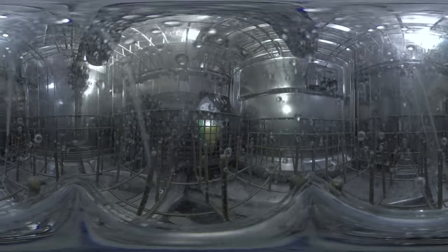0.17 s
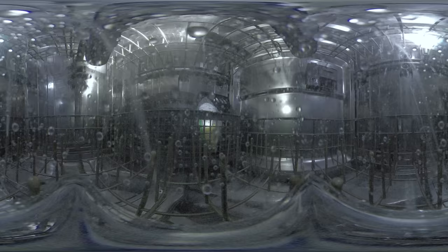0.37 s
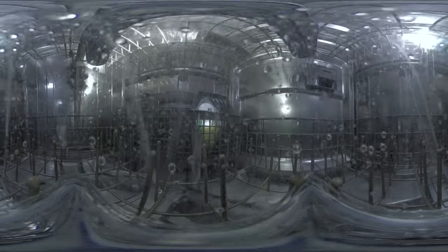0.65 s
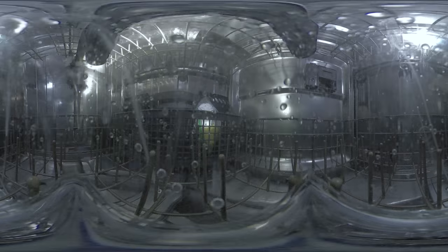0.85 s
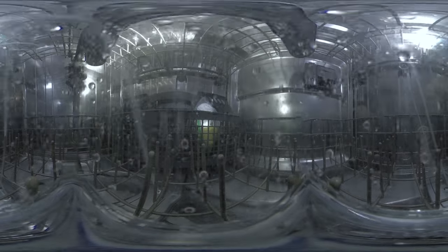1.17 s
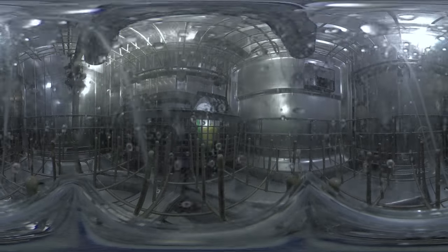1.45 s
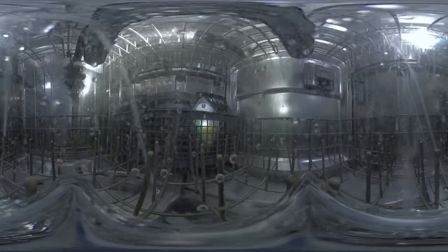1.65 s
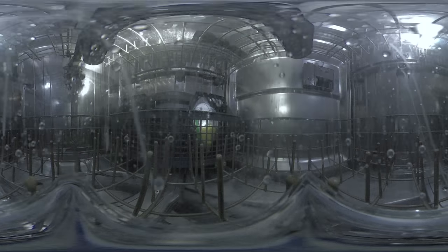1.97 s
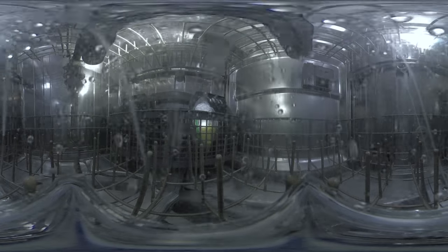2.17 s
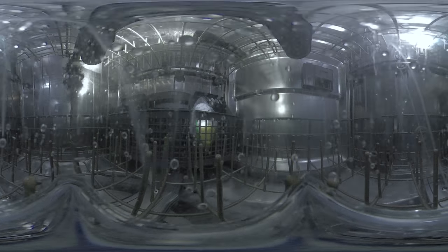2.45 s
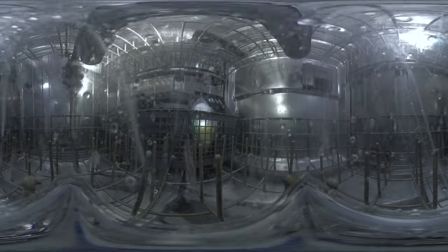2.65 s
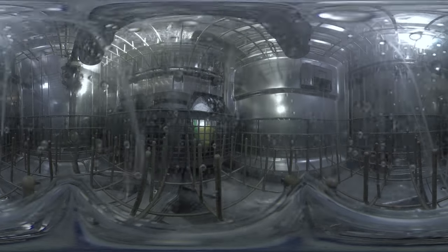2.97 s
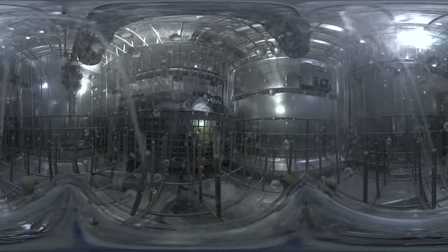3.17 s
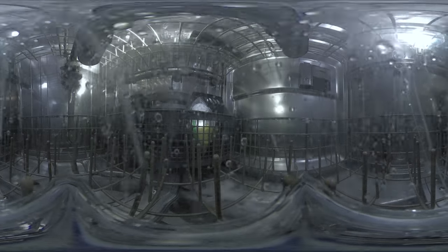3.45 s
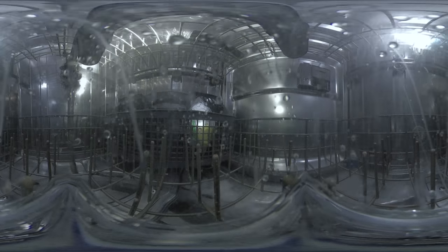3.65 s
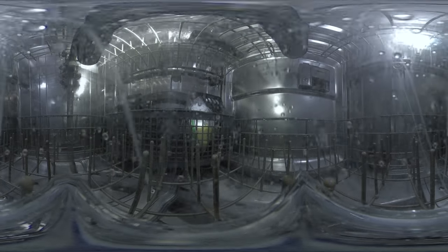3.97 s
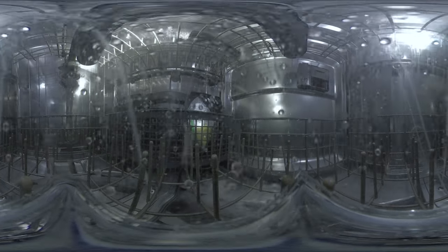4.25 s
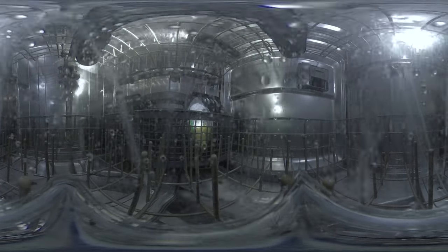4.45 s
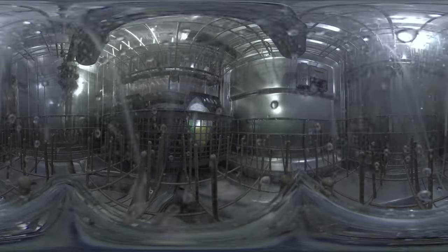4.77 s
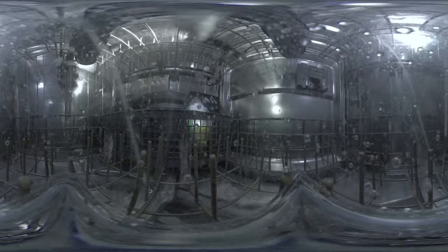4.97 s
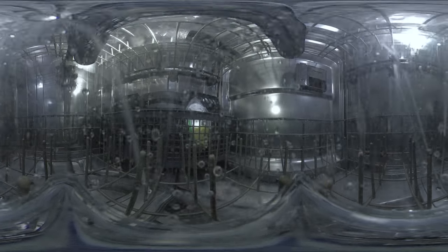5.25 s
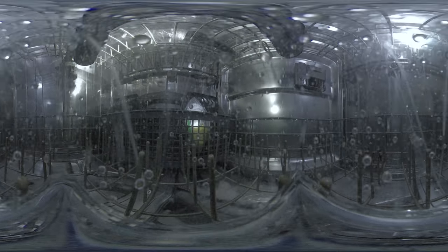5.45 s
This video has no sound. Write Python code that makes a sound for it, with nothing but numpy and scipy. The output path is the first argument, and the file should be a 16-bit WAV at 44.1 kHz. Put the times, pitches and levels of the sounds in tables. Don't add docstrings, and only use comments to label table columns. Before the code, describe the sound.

A dense, resonant water roar fills a small steel tub from start to end, pulsing several times a second as the turning jets cross walls, racks and case. Bright millisecond ticks scatter over it, clustered between 1.1 and 1.8 seconds, sparser afterwards. The loudest clacks, around 3 and 5.3 seconds, ring briefly and overload the input. The cased stereo microphone sits in the spray; a pump hums faintly.

```python
import sys
import numpy as np
from scipy import signal
from scipy.fft import rfft, irfft
from scipy.io import wavfile

SR = 44100
rng = np.random.default_rng(int(sys.argv[2]) if len(sys.argv) > 2 else 0)


def materialize(psi):
    bounded = np.clip(np.atleast_2d(psi).T, -1, 1)
    quanta = np.round(bounded * 32767).astype(np.int16)
    wavfile.write(sys.argv[1], SR, quanta)


def nominal_scale(level):
    x = np.asarray(level, float) / 20
    return 10 ** x


N = 247401

# frequency in Hz, width in Hz, left level in dB rms,
# right level in dB rms, phase of right against left in radians.
TUB_MODES = [(199, 47, -59, -52, -2), (236, 29, -52.5, -45.5, -2.5), (275, 40, -54, -45.5, -2.5),
             (413, 86, -59.5, -51.5, -1.5), (491, 79, -48.5, -40.5, -2.5), (586.5, 87, -34, -29, -3.0),
             (704, 77, -33, -28.5, -3), (822, 79, -31, -25.5, 3), (895.6, 38, -34, -27.5, 3),
             (976, 140, -35.5, -29, 2.32), (1046.4, 46, -41.5, -26.5, 1.9), (1119, 45.4, -35.5, -24.5, 1.5),
             (1189, 54, -50, -33.5, 1.87), (1252, 54, -39.5, -40, 1.5), (1282.7, 21, -54, -33, 0.83),
             (1325, 10.5, -62, -39, 1.76), (1420, 52, -56, -40, 0.34), (1534, 33, -52, -41, -3),
             (1675, 28, -57, -42, -1.5), (1807, 145, -43, -46, 1), (1936, 74, -35, -39.5, 2.5),
             (2234, 17, -44.5, -73, 8.3)]
# frequency in Hz, width in Hz, left level in dB rms,
# right level in dB rms, phase of right against left in radians.
CASE_MODES = [(2360, 24, -49.7, -54.5, 0.5), (2470, 84, -44.4, -39.6, -1.1), (2620, 34, -48.5, -42.7, -0.3),
              (2719, 38, -43.2, -34.4, -0.1), (2860, 359, -43.3, -37.0, -0.4),
              (3150, 146, -51.2, -42.7, -0.8), (3640, 83, -50.1, -43.1, -0.4),
              (3920, 302, -36.6, -40.5, -2.8), (4030, 100, -45.7, -37.2, -2.9),
              (4390, 170, -42.5, -35, 0.8), (4490, 24, -58, -47.4, 0.3), (4610, 239, -41, -42, 0.2),
              (4770, 41, -42.7, -41.4, -0.2), (4910, 219, -32.4, -32.7, -0.2),
              (5180, 402, -58, -38.0, -0.1), (6220, 982, -42.4, -42.3, 1.7),
              (7130, 640, -41.6, -34.8, -1.3), (9300, 233, -45.1, -58, -0.5),
              (11530, 894, -39.4, -42.0, -1.8), (12990, 1134, -43.8, -41.7, 1.2),
              (13830, 559, -37.6, -58, -2.9), (15560, 706, -38.0, -42.6, 0.0)]
# time in seconds, swell in dB.
WALL_PASSES = [(0.07, 3), (0.32, 2.5), (0.52, 3.5), (0.87, 3), (1.1, 3.5), (1.23, 1.4), (1.49, 1.5),
               (1.75, 2), (2.0, 5), (2.26, 1.8), (2.71, 2.7), (3.18, 2.8), (3.35, 3), (3.75, 1.8),
               (4.06, 2.5), (4.43, 4.1), (4.62, 4.5), (4.73, 1.7), (5.12, 2.5), (5.53, 4.5)]
# time in seconds, swell in dB.
RACK_PASSES = [(0.025, 10), (0.838, 9.3), (1.422, 15.5), (1.576, 6.1), (1.736, 8), (1.971, 3), (2.464, 8),
               (3.078, 11), (3.153, 13), (3.218, 6.7), (3.347, 7), (3.956, 1), (4.056, 7), (4.51, 10),
               (4.58, 5), (4.634, 12), (4.964, 11.5), (5.059, 4.4), (5.133, 4.9), (5.213, 11.5),
               (5.308, 11), (5.363, 7.2), (5.468, 7.6), (5.557, 6.0)]
# time in seconds, swell in dB.
CASE_PASSES = [(0.13, 2), (0.31, 3), (0.74, 2.2), (0.9, 1), (1.15, 1.5), (1.27, 0), (1.62, 1), (1.76, 1.5),
               (2.01, 2.5), (2.43, 1.2), (2.56, 1.5), (3.23, 0.5), (3.47, 3), (3.8, 1.5), (3.95, 2.4),
               (4.52, 1.5), (4.69, 1.5), (4.9, 0.5), (5.24, 3.4), (5.49, 1)]
# time in seconds, splash level in dB, colour in Hz,
# spread in octaves, ring level in dB.
KNOCKS = [(0.0046, -20, 4630, 0.65, -22), (0.2953, -29, 9000, .53, -23), (0.7505, -18.5, 5500, 0.72, -14),
          (0.9007, -13, 7100, 0.22, -18), (1.1898, -13.5, 14500, .42, -21), (1.2566, -19, 5670, .15, -26),
          (1.3671, -31, 9500, .46, -29), (1.5961, -18, 5000, 1.4, -16), (1.7585, -27, 8600, .45, -28),
          (2.9935, -12.5, 5900, 0.2, -5.5), (3.2342, -21, 2900, .4, -18.5), (3.4849, -30, 7700, .7, -28),
          (3.7969, -11, 15500, 0.27, -28), (4.4754, -27, 9100, .44, -24), (4.5541, -29, 7900, .68, -28),
          (4.7106, -8.5, 7150, 0.21, -13.5), (5.1611, -22, 7400, .44, -24), (5.2502, -27, 8700, .7, -23),
          (5.2588, -20, 8600, 0.39, -30), (5.2632, -18, 6400, .4, -4.5)]
# time in seconds, splash level in dB, colour in Hz,
# spread in octaves.
TICKS = [(0.0921, -17, 14000, 0.44), (0.3588, -20.5, 7700, 0.23), (0.8831, -25, 6000, .7),
         (1.1409, -25, 10500, .7), (1.2025, -23, 6500, .39), (1.2703, -27, 12300, .31),
         (1.335, -27, 7800, .16), (1.4727, -28, 9000, .41), (1.4949, -19, 6900, .11),
         (1.5152, -25, 13800, .24), (1.6171, -20, 8700, .4), (1.7634, -22, 7400, 0.54),
         (1.8778, -22, 10000, .32), (2.3082, -25, 13600, .21), (2.335, -24, 9000, .24),
         (2.5505, -26, 8900, .5), (2.5565, -27, 7800, .67), (2.9312, -28, 5900, .69),
         (3.3375, -14, 1130, 0.079), (3.4364, -35, 5300, .7), (3.4524, -24, 12000, .17),
         (3.7894, -24, 8200, .7), (4.33, -16, 12800, .16), (4.5176, -22, 1700, 0.32),
         (4.5625, -28, 12500, .47), (5.4853, -16, 10700, 0.21), (5.5749, -28, 6900, .7)]
# frequency in Hz, width in Hz, left level in dB, right level in dB,
# phase of right against left in radians.
DROP_RING_MODES = [
    (5000, 260, 0, 0, -.2),
    (5500, 400, -7, -11, .4),
    (2750, 400, -19, -16, 0),
]
# time in seconds, peak level in dB.
THUDS = [
    (2.9935, -47),
    (3.797, -38),
    (4.97, -43),
    (5.2632, -42),
]
# frequency in Hz, left level in dB per Hz,
# right level in dB per Hz.
HISS_COLOUR = [(30, -96, -97), (61.7, -76.5, -75), (103, -78, -87), (191, -70, -72), (332, -74.5, -70.5),
               (735, -67, -55), (1390, -77.5, -63.5), (2360, -69, -66.5), (3280, -75, -66),
               (5430, -73.5, -70), (8900, -72, -73), (10700, -75, -77.5), (13300, -97, -71.5),
               (15300, -76, -84)]
# frequency in Hz, left level in dB rms, right level in dB rms.
PUMP_LINES = [
    (57, -63, -70),
    (119.2, -57.5, -60),
    (233, -58, -52.5),
]

TUB_TO_HZ, CASE_FROM_HZ, MIST_FROM_HZ = 1700, 3400, 5600
RACK_FROM_HZ, RACK_TO_HZ = 2600, 2800
WALL_PASS_S, RACK_PASS_S, CASE_PASS_S = 0.052, 0.018, 0.036
MIST_FOLLOWS = 0.86
TICK_RING_DB = -40
STRAY_DROPS, STRAY_DB, STRAY_HZ, STRAY_OCTAVES = 16, -27.5, 10000, .5
EVEN_HZ, PAN_DB_PER_OCTAVE = 11000, 4.5
CRACK_DB, PORT_HZ, PORT_DB = -8.0, 15300, -12.0
INPUT_TOP_HZ = 15740


def drummed_modes(tub, rack, case, mist, lumps, flicker_db, alike):
    out = np.zeros((2, N))
    white = rng.standard_normal((3, N))
    flickers = [nominal_scale(flicker_db * drift(8.0)) for k in range(8)]
    near_rack = rms_one(rack ** 0.32)
    for k, mode in enumerate([*TUB_MODES, *CASE_MODES]):
        hz = mode[0]
        if hz < TUB_TO_HZ:
            force = tub
        elif RACK_FROM_HZ < hz < RACK_TO_HZ:
            force = rack
        elif hz < CASE_FROM_HZ:
            force = near_rack
        elif hz < MIST_FROM_HZ:
            force = case
        else:
            force = mist
        shifted = np.roll(white, 5003 * k, axis=1)
        drive = shifted[2]
        if hz > MIST_FROM_HZ:
            drive = np.sqrt(alike) * drive + np.sqrt(1 - alike) * shifted[:2]
        if hz > TUB_TO_HZ:
            force = force * lumps
        if hz > 300:
            drive = drive * (force * flickers[k % len(flickers)])
        out += resonate(drive, mode)
    return out


def resonate(drive, mode):
    hz, width_hz, left_db, right_db, phase = mode
    r = np.exp(-2 * np.pi * .78 * width_hz / SR)
    pole = r * np.exp(2j * np.pi * hz / SR)
    scale = np.sqrt(2 * (1 - r * r) ** 3 / (1 + r * r))
    swing = scale * signal.lfilter([1], [1, -2 * pole, pole * pole], drive)
    ports = np.array([[nominal_scale(left_db)], [nominal_scale(right_db) * np.exp(1j * phase)]])
    return (swing * ports).real


def sweep_gains():
    wall_db = swells(WALL_PASSES, WALL_PASS_S)
    rack_db = swells(RACK_PASSES, RACK_PASS_S)
    case_db = swells(CASE_PASSES, CASE_PASS_S)
    return [rms_one(nominal_scale(db)) for db in (wall_db, rack_db, case_db, MIST_FOLLOWS * case_db)]


def swells(passes, width_s):
    s, swell_db = np.transpose(passes)
    coarse = np.arange(0, N + 128, 128) / SR
    bells = np.exp(-.5 * ((coarse[:, None] - s) / width_s) ** 2)
    return np.interp(np.arange(N) / SR, coarse, bells @ swell_db)


def spatter(per_s, spread_db):
    sizes = nominal_scale(spread_db * np.minimum(rng.exponential(1, N), 4))
    splats = sizes * (rng.random(N) < per_s / SR)
    fade = np.exp(-1 / (.006 * SR))
    return rms_one(np.sqrt(1 + .13 * signal.lfilter([1], [1, -fade], splats ** 2)))


def drift(rate):
    r = np.exp(-80 * np.pi * rate / SR)
    slow = signal.lfilter([1], [1, -2 * r, r * r], rng.standard_normal(N // 40 + 1002))[1000:]
    return np.interp(np.arange(N) / 40, np.arange(len(slow)), rms_one(slow))


def rms_one(x):
    return x / np.sqrt(np.mean(x ** 2, axis=-1, keepdims=True) + 1e-20)


def drops():
    size = 512
    ms = np.arange(size) / SR * 1000
    shape = (1 - np.exp(-ms / .3)) * (np.exp(-(ms / 1.6) ** 2) + .15 * np.exp(-ms / 2.5))
    ring = sum(resonate(np.eye(1, size), mode) for mode in DROP_RING_MODES)
    ring = ring / np.sqrt(np.mean(ring[:, :size // 4] ** 2))
    crack_band = signal.butter(2, 3000, "high", fs=SR, output="sos")
    port_band = signal.butter(2, [PORT_HZ - 700, PORT_HZ + 700], "band", fs=SR, output="sos")
    rows = all_drops()
    noise = rng.standard_normal((len(rows), 3, size))
    out = np.zeros((2, N + size))
    for (s, splash_db, hz, octaves, ring_db), (both, *own) in zip(rows, noise):
        burst = shape * (both + .7 * np.array(own))
        edges = np.minimum(hz * 2 ** (np.array([-1.1, 1.1]) * octaves), .45 * SR)
        colour_band = signal.butter(2, edges, "band", fs=SR, output="sos")
        splash = rms_one(signal.sosfilt(colour_band, burst))
        crack = nominal_scale(CRACK_DB) * rms_one(signal.sosfilt(crack_band, burst))
        crack = crack + nominal_scale(PORT_DB) * rms_one(signal.sosfilt(port_band, burst))
        splash = .5 * rms_one(splash + crack * (hz > 3000))
        pan_db = np.array([[.5], [-.5]]) * np.clip(PAN_DB_PER_OCTAVE * np.log2(hz / EVEN_HZ), -4, 2)
        at = round(s * SR)
        out[:, at:at + size] += splash * nominal_scale(splash_db - 1.5 + pan_db) + ring * nominal_scale(ring_db)
    return out[:, :N]


def all_drops():
    when, pitch = rng.random((STRAY_DROPS, 2)).T
    strays = [(s * N / SR, STRAY_DB, STRAY_HZ * 2 ** (p - .5), STRAY_OCTAVES) for s, p in zip(when, pitch)]
    return list(KNOCKS) + [(*row, TICK_RING_DB) for row in list(TICKS) + strays]


def thuds(push_ms):
    ms = np.arange(N) / SR * 1000
    out = np.zeros(N)
    for s, peak_db in THUDS:
        since = np.maximum(ms - s * 1000, 0) / push_ms
        out += nominal_scale(peak_db) * since * np.exp(1 - since)
    return out


def hiss(mist, lumps, bass_alike_hz):
    hz = np.maximum(np.fft.rfftfreq(N, 1 / SR), 5)
    points, left_db, right_db = np.transpose(HISS_COLOUR)
    colour = nominal_scale([np.interp(np.log(hz), np.log(points), side) for side in (left_db, right_db)])
    colour = colour * np.minimum(hz / points[0], 1) ** 2 * np.sqrt(SR / 2)
    upper = 1 / (1 + (2500 / hz) ** 4)
    alike = 0.96 / (1 + (hz / bass_alike_hz) ** 2)
    white = rng.standard_normal((3, N))
    steady = rfft(white)
    steady = np.sqrt(alike) * steady[2] + np.sqrt(1 - alike) * steady[:2]
    swept = rfft(white[:2] * mist * lumps)
    return irfft(colour * (steady * (1 - upper) + swept * upper), N)


def pump(waver_db, waver_hz):
    out = np.zeros((2, N))
    for hz, left_db, right_db in PUMP_LINES:
        phase = 2 * np.pi * np.cumsum(hz + waver_hz * drift(2.9)) / SR
        level_db = waver_db * drift(6.0) + [[left_db], [right_db]]
        out += np.sqrt(2) * np.sin(phase) * nominal_scale(level_db)
    return out


def scene():
    tub, rack, case, mist = sweep_gains()
    lumps = spatter(per_s=220.0, spread_db=2.5)
    ringing = drummed_modes(tub, rack, case, mist, lumps, flicker_db=2.04, alike=0.13)
    on_the_case = drops() + thuds(push_ms=2.6)
    background = hiss(mist, lumps, bass_alike_hz=250) + pump(waver_db=3.0, waver_hz=4.02)
    return ringing + on_the_case + background


def band_limit(x):
    return signal.sosfilt(signal.butter(12, 16510, fs=SR, output="sos"), x)


def record(dry):
    low_pass = signal.ellip(12, .3, 70, INPUT_TOP_HZ, fs=SR, output="sos")
    mix = np.clip(signal.sosfilt(low_pass, dry), -1, 1)
    return band_limit(mix)


dry = scene()
out = record(dry)
materialize(out)
```